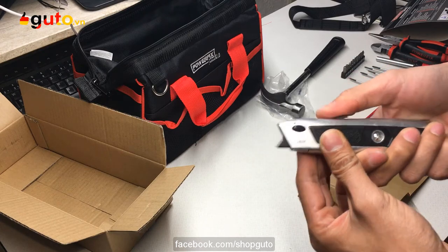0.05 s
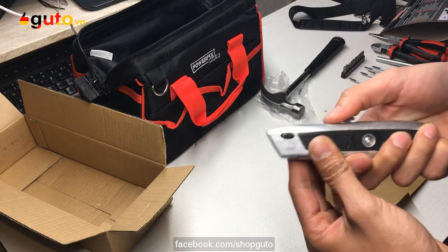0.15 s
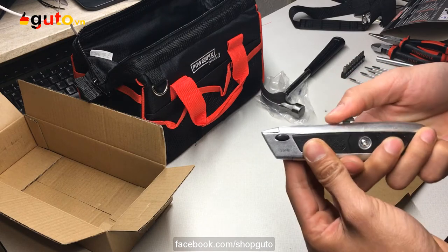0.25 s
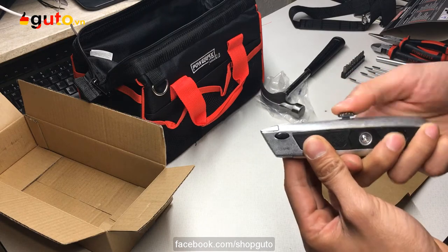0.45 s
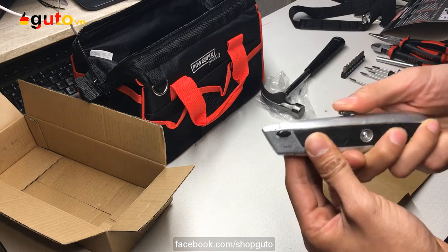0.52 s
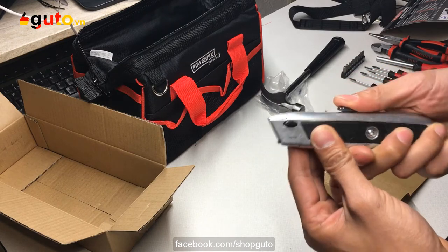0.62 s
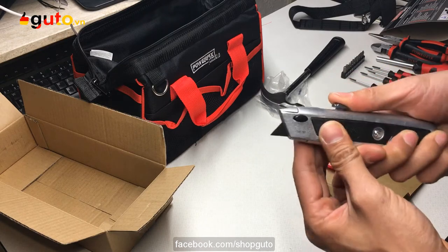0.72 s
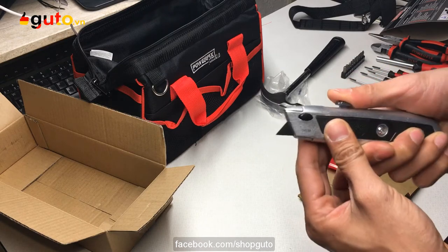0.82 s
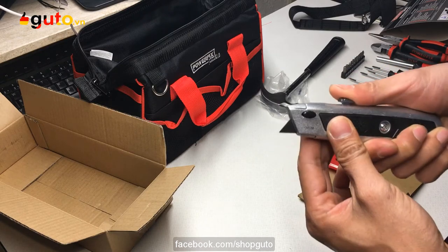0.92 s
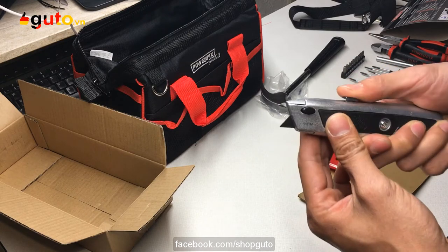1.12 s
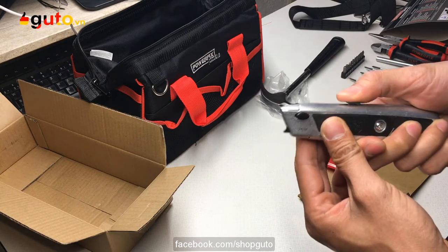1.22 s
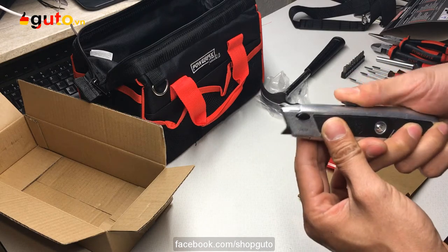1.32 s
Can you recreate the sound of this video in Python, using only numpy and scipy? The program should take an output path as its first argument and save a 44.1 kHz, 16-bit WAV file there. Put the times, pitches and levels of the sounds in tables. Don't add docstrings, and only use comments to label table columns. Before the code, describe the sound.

A utility knife's slider is worked close to the microphone. Faint ticks and scraping build from 0.07 seconds to a hard metallic snap at 0.21, a lighter click at 0.24 and the loudest clack at 0.27. After a faint drag, a soft click comes at 0.65, quick ticks, then a thinly ringing lock at 0.82. Light scrapes and ticks follow around 1.15-1.35, over short room echo and low hum.

```python
import sys
import numpy as np
from scipy import signal
from scipy.fft import rfft, irfft
from scipy.io import wavfile

SR = 44100
rng = np.random.default_rng(int(sys.argv[2]) if len(sys.argv) > 2 else 0)


def ratio(d):
    e = np.asarray(d, float) / 20
    return 10 ** e


def file_out(sig):
    cols = np.atleast_2d(sig).T
    lim = np.clip(cols, -1, 1)
    pcm = np.round(lim * 32767).astype(np.int16)
    wavfile.write(sys.argv[1], SR, pcm)


N = 59535

# start in seconds, peak level in dB, extra level towards the walls in dB,
# ring stretch as a factor, rise in seconds.
SNAPS = [
    (0.2101, -7.5, 5, 1.5, 0.00021),
    (0.2424, -18.5, 5, 0.62, 0.00093),
    (0.2697, -6, 3, 1.05, .0002),
    (0.6486, -28.5, 2.5, 0.91, 0.00048),
    (0.8176, -21, -2, 0.92, 0.00046),
]
# frequency in Hz, level in dB.
RELEASE_MODES = [(1350, -23), (2065, -13), (2470, -14.5), (3120, -6), (3880, -8.5), (4600, -12),
                 (5340, -8.5), (6750, -8.5), (8100, 3), (9500, -11.5), (11270, -2), (12200, -15),
                 (14500, -14), (15300, -15)]
NOTCH_MODES = [(2050, -4), (2440, -0.5), (3150, -13), (4300, -7), (5300, -1), (6700, -0.5), (8200, -20),
               (9300, -17), (11800, 1.5), (14000, -16.5)]
STOP_MODES = [(1960, -4.5), (2470, -4.5), (3160, -3), (4215, -5), (4880, -6.5), (5750, 3), (6580, 2),
              (7330, 0.5), (9260, 3), (11540, -1.5), (13200, -5), (15000, -13)]
SEAT_MODES = [(2150, -6), (2450, -1.5), (3100, -12), (3900, -5), (4600, -3.5), (5300, -3), (6100, -12),
              (7000, -2), (8800, -12), (11000, -19), (13500, -22.5)]
LOCK_MODES = [(1900, -13), (2190, -6.5), (2430, -2.5), (3150, 1), (3400, -10), (4300, -16.5), (5100, -4),
              (5940, 2.5), (6900, -1.5), (8900, 3.5), (10300, -22), (11700, -1), (14000, -6.5)]
# delay in seconds, level in dB.
BOUNCES = [(.0005, -6), (.0011, -6.5), (.0017, -8.5), (.0024, -12.5), (.0033, -11), (.008, -13)]
# frequency in Hz, level in dB, t60 in seconds.
BLADE = [(3025, -47, 0.028), (3164, -44, 0.024), (3224, -36, 0.043), (3350, -38, .03), (3505, -45.5, 0.044),
         (3120, -59, 0.29), (3180, -65, 0.39), (3250, -58.5, 0.32)]
# start in seconds, handle peak in dB, carrier peak in dB, carrier pitch in Hz.
TICKS = [(0.069, -61, -52, 10400), (0.074, -74, -44.5, 10500), (0.077, -74, -41.5, 10600),
         (.0795, -77, -47.5, 10050), (.0935, -52, -46, 10500), (0.097, -55, -61, 10000),
         (.106, -72, -54, 9500), (0.1245, -50, -43, 11000), (.1445, -49, -55, 6000),
         (0.1545, -37.5, -46, 9000), (.1575, -52, -40.5, 5670), (.161, -44, -44, 8500),
         (0.1672, -35.5, -37, 9600), (0.1726, -35, -37.5, 9600), (0.1755, -57, -41, 9900),
         (.183, -41, -52, 5500), (.1955, -40, -55, 8100), (.2469, -49, -19.5, 7310),
         (.2505, -32, -45, 3700), (.264, -28, -50, 4000), (0.362, -38, -32.5, 3740),
         (0.6462, -43.5, -48, 10760), (.6565, -46, -52.5, 4500), (0.7055, -41.5, -40, 4360),
         (.723, -64, -43.5, 10700), (0.73, -39, -40, 11920), (.7375, -39, -51, 11470),
         (0.748, -40.5, -45.5, 8980), (.757, -40.5, -51.5, 8500), (.764, -38, -52, 7000),
         (.778, -39, -46.5, 11020), (.786, -60, -50.5, 10500), (.7945, -59.5, -52, 9000),
         (.7995, -52, -52, 8500), (.804, -70, -42, 11210), (0.814, -50.5, -41, 8990),
         (1.1568, -50, -41.5, 8770), (1.2035, -66, -57.5, 8500), (1.214, -73, -52.5, 8940),
         (1.2501, -68, -58, 8290), (1.2828, -43, -40, 9300), (1.2978, -44.5, -43.5, 12500),
         (1.3075, -50, -47, 4060), (1.333, -60, -52, 9000), (1.3024, -47, -48.5, 6460),
         (1.325, -56, -57, 9500), (1.343, -51, -49, 10500), (1.1584, -56, -53, 3710),
         (1.152, -56.5, -67, 3660)]
# frequency in Hz, level in dB.
HANDLE_MODES = [(1910, -7.5), (2170, -4), (2430, -5), (2750, -19.5), (3200, -0.5), (3670, -13), (4280, -13)]
# frequency in Hz, level in dB.
CARRIER_MODES = [(3700, -2), (4300, -1.1), (5300, 2), (6100, 0), (6900, 2), (7700, -2), (8500, 0.2),
                 (9500, 2.5), (10400, -2.5), (11500, 0.3), (12500, 0.5), (13600, -2), (14800, -4)]
# time in seconds, level in dB, brightness in dB.
SLIDES = [
    [(.04, -71, -4), (.09, -60, -5.5), (.125, -56, -8), (.15, -58, -5), (.175, -49.5, 3),
     (.195, -52.5, -14), (.24, -54, 9), (.268, -39, -31)],
    [(.36, -68, -8), (.45, -71.5, 2.5), (.55, -71, 1), (.64, -66.5, -0.5), (.66, -65, -8), (.7, -61, -18)],
    [(.715, -45, -10.5), (.73, -60, 4.5), (.75, -49.5, -5.5), (.77, -55, -3), (.785, -58, -2.5),
     (.8, -63.5, 3.5), (.818, -60, 4)],
    [(1.19, -85, -1.5), (1.21, -69, -1.5), (1.24, -81.5, -1), (1.27, -68, -7.5), (1.29, -55.5, -3.5),
     (1.305, -48.5, -3.5), (1.32, -62, -8.5), (1.335, -54.5, -4), (1.35, -67, -5)],
]
# start in seconds, level in dB, frequency in Hz, t60 in seconds.
THUDS = [(.2105, -48.5, 682, .007), (.27, -40, 340, 0.02), (.27, -38.5, 696, 0.018),
         (.283, -49.5, 817, 0.065), (0.2109, -53, 910, 0.021), (.27, -42.5, 520, 0.01),
         (.818, -41.5, 1500, 0.0094), (0.2101, -50, 329.5, 0.014), (0.2107, -34.5, 1230, .012),
         (0.242, -41.5, 1047, .02), (0.272, -41, 1307, .015), (0.819, -46.5, 86.3, 0.18),
         (0.863, -47, 82.6, 0.11)]
# frequency in Hz, t60 in seconds.
ROOM_T60 = [(600, 0.22), (2000, 0.27), (3300, 0.26), (6000, 0.26), (10000, 0.21), (16000, 0.13)]
# frequency in Hz, level in dB.
ROOM_COLOUR = [(600, 17), (1500, -4.5), (2100, 2), (3000, -3.5), (6000, -0.5), (10000, -6), (16000, -1.5)]
# frequency in Hz, density in dB per Hz.
AIR = [(15, -32), (120, -9), (155, -8), (195, -16), (575, -22.5), (988, -22.5), (1790, -31.5),
       (14000, -48.5), (16000, -60.5)]

CRACK_DB, CRACK_T60_S = -7.5, 0.0059
POP_DB, POP_LAG_S, POP_STRETCH = 6, 0.006, 0.6
BLADE_SPREAD_DB = 2.5
RING_CYCLES, RING_FLOOR_S = 30, 0.003
TICK_RISE_S, TICK_OCTAVES = 0.00052, 0.28
TICK_BODY_HZ, TICK_BODY_OCTAVES = 2140, 0.36
GRAINS_PER_S, GRAIN_SPREAD_DB = 2500, 3.5
THUD_RISE_CYCLES = 0.3
ROOM_DB, ROOM_START_S = -5.5, 0.0049
LATE_DB, LATE_LONGER = -18.5, 2.94
AIR_DB = -62
HUM_HZ, HUM_WIDTH_HZ, HUM_DB = 49.6, 8.5, -67.5
BEAT_DB, BEAT_PER_S, BEAT_TOP_S, BEAT_DEPTH = -62, 2.3, 0.06, 0.45


def evened(x):
    return x / np.sqrt(np.mean(x ** 2) + 1e-20)


def read(points, hz):
    f, value = np.transpose(points)
    return np.interp(np.log(hz + 1), np.log(f + 1), value)


def add(mix, s, sound):
    part = mix[round(s * SR):][:len(sound)]
    part += sound[:len(part)]


def ring(modes, chance, loose=0., rise_s=0.00016, tilt_db=0., stretch=1.):
    hz, db = np.transpose(modes)[:, :, None]
    t = np.arange(1500) / SR
    phase, level_luck, pitch_luck = chance[:, :len(modes), None]
    t60 = stretch * (RING_CYCLES / hz + RING_FLOOR_S)
    level_db = db + tilt_db + 6 * loose * (level_luck - 0.5) - 60 * t / t60
    detuned_hz = hz * (1 + 0.094 * loose * (pitch_luck - 0.5))
    x = (ratio(level_db) * np.sin(2 * np.pi * (detuned_hz * t + phase))).sum(0)
    x = x * np.sin(np.pi / 2 * np.minimum(t / rise_s, 1)) ** 2
    return x / abs(x).max()


def near(modes, hz, octaves, floor_db):
    distance = np.log2(np.transpose(modes)[0] / hz)[:, None] / octaves
    return np.maximum(-6 * distance ** 2, floor_db)


def blade():
    t = np.arange(12000) / SR
    return sum(ratio(db - 60 * t / t60) * np.sin(2 * np.pi * hz * t) for hz, db, t60 in BLADE)


def snaps():
    direct, around = np.zeros(N), np.zeros(N)
    blows = [(0.000045, 0.0062)] + BOUNCES
    chance = rng.random((len(SNAPS), len(blows), 3, 14))
    cracks = rng.standard_normal((len(SNAPS), len(blows), 400))
    t = np.arange(400) / SR
    contacts = (RELEASE_MODES, NOTCH_MODES, STOP_MODES, SEAT_MODES, LOCK_MODES)
    for (s, db, spread_db, stretch, rise_s), modes, u, noises in zip(SNAPS, contacts, chance, cracks):
        crack_rise = np.minimum(t / rise_s, 1)
        for (lag, fall_db), v, noise in zip(blows, u, noises):
            blow_db = db + fall_db
            crack_level = ratio(blow_db + CRACK_DB - 60 * t / CRACK_T60_S)
            add(direct, s + lag, ratio(blow_db) * ring(modes, v, 0.18, rise_s, stretch=stretch))
            add(direct, s + lag, crack_level * crack_rise * noise)
        wall_db = db + spread_db
        add(around, s, ratio(wall_db) * ring(modes, u[0], stretch=POP_STRETCH))
        add(around, s + POP_LAG_S, ratio([wall_db + POP_DB]))
    singing = blade()
    add(direct, SNAPS[-1][0], singing)
    add(around, SNAPS[-1][0], ratio(BLADE_SPREAD_DB) * singing)
    return np.array([direct, around])


def ticks():
    out, chance = np.zeros(N), rng.random((len(TICKS), 2, 3, 14))
    body_db = near(HANDLE_MODES, TICK_BODY_HZ, TICK_BODY_OCTAVES, -12)
    for (s, handle_db, carrier_db, hz), (u, v) in zip(TICKS, chance):
        pitch_db = near(CARRIER_MODES, hz, TICK_OCTAVES, -13)
        handle = ratio(handle_db) * ring(HANDLE_MODES, u, 0.44, TICK_RISE_S, body_db)
        carrier = ratio(carrier_db) * ring(CARRIER_MODES, v, 1., TICK_RISE_S / 4, pitch_db)
        add(out, s, handle + carrier)
    return out


def rubbed(grit, spot, modes, chance):
    parts = [signal.oaconvolve(grit * (spot == k), ring(modes, u, 0.98))[:N] for k, u in enumerate(chance)]
    return evened(sum(parts))


def scrape():
    t, out, spots = np.arange(N) / SR, np.zeros(N), 12
    grain_level = ratio(GRAIN_SPREAD_DB * np.minimum(rng.exponential(1, N), 4))
    grit = grain_level * (rng.random(N) < GRAINS_PER_S / SR)
    spot = rng.integers(0, spots, N)
    handle_chance, carrier_chance = rng.random((2, spots, 3, 14))
    dull = rubbed(grit, spot, HANDLE_MODES, handle_chance)
    bright = rubbed(grit, spot, CARRIER_MODES, carrier_chance)
    for slide in SLIDES:
        s, db, bright_db = np.transpose(slide)
        inside = np.clip(np.minimum(t - s[0], s[-1] + 0.0096 - t) / 0.014, 0, 1)
        out += inside * ratio(np.interp(t, s, db)) * (dull + ratio(np.interp(t, s, bright_db)) * bright)
    return out


def thuds():
    out, t = np.zeros(N), np.arange(8000) / SR
    for s, db, hz, t60 in THUDS:
        rise = 1 - np.exp(-t * hz / THUD_RISE_CYCLES)
        add(out, s, ratio(db - 60 * t / t60) * rise * np.sin(2 * np.pi * hz * t))
    return out


def room(x):
    taps = np.zeros(SR)
    at = np.arange(0, len(taps) - 10, 10)
    taps[at + rng.integers(0, 10, len(at))] = rng.choice([-1., 1.], len(at))
    hz, t, z = signal.stft(taps, SR, nperseg=128)
    t60 = read(ROOM_T60, hz)[:, None]
    early = ratio(-60 * t / t60)
    late = ratio(LATE_DB - 60 * t / (LATE_LONGER * t60))
    colour = ratio(read(ROOM_COLOUR, hz)[:, None])
    tail = signal.istft(z * colour * (early + late), SR, nperseg=128)[1]
    tail = tail * np.clip(np.arange(len(tail)) / SR / ROOM_START_S - 0.5, 0, 1)
    return ratio(ROOM_DB) * signal.fftconvolve(x, tail / np.linalg.norm(tail))[:N]


def air():
    hz, t = np.fft.rfftfreq(N, 1 / SR), np.arange(N) / SR
    a, b = rfft(rng.standard_normal((2, N)))
    tone = evened(irfft(a * ratio(read(AIR, hz)) * (hz > 62), N))
    hum = evened(irfft(b / (1 + ((hz - HUM_HZ) / HUM_WIDTH_HZ) ** 2), N))
    throb = 1 + BEAT_DEPTH * np.cos(2 * np.pi * BEAT_PER_S * (t - BEAT_TOP_S))
    beat = throb * np.sin(2 * np.pi * HUM_HZ * t)
    return ratio(AIR_DB) * tone + ratio(HUM_DB) * hum + ratio(BEAT_DB) * evened(beat)


def scene():
    thin = signal.butter(6, 1683, "high", fs=SR, output="sos")
    knife, around = signal.sosfilt(thin, snaps() + ticks() + scrape())
    return (knife + room(around) + air() + thuds())[None]


def low_pass(x):
    return signal.sosfilt(signal.butter(12, 16820, fs=SR, output="sos"), x)


def record(dry):
    band_limit = signal.firwin(101, 16100, fs=SR)[None]
    mix = signal.oaconvolve(dry, band_limit, "same")
    return low_pass(mix)


dry = scene()
out = record(dry)
file_out(out)
```